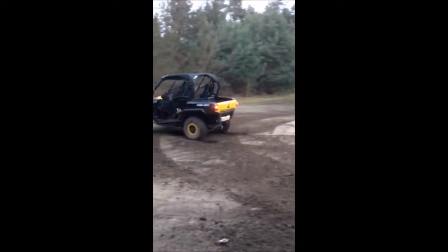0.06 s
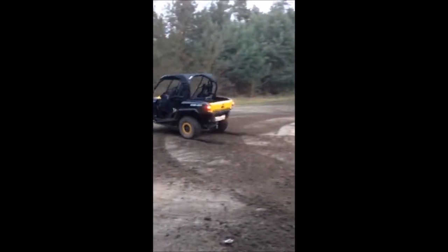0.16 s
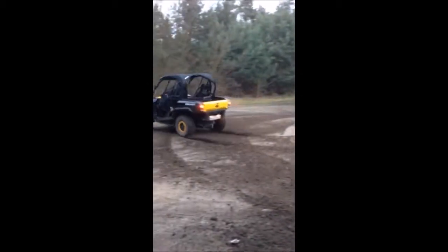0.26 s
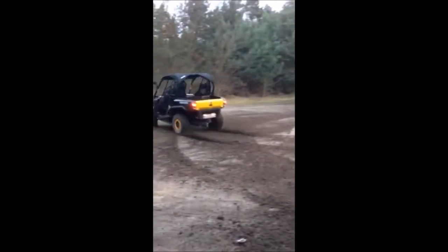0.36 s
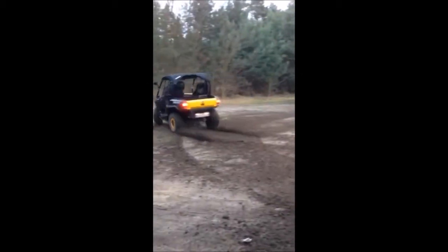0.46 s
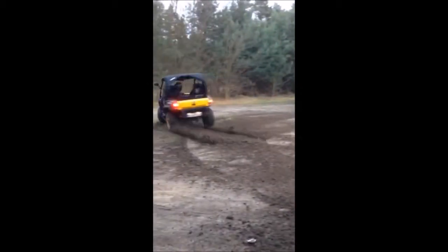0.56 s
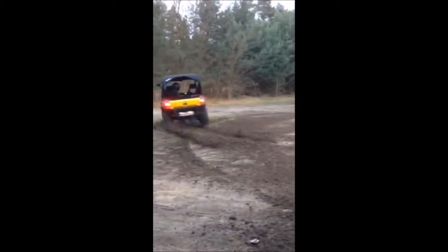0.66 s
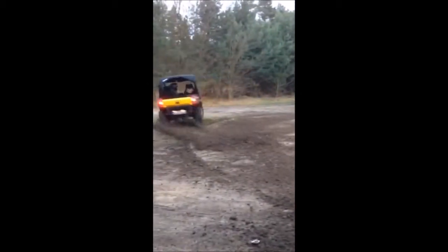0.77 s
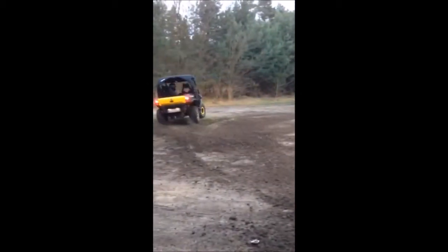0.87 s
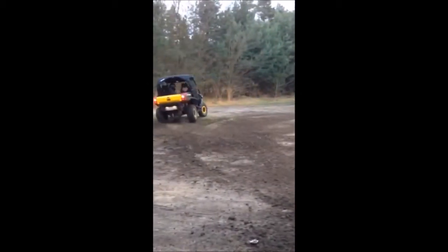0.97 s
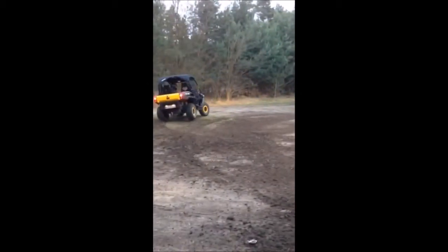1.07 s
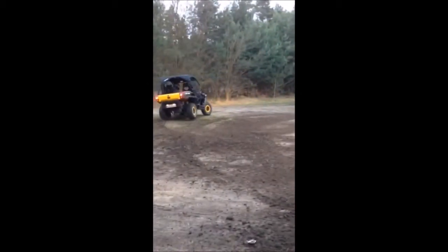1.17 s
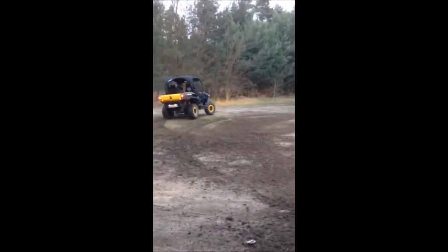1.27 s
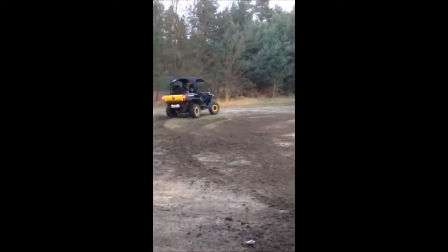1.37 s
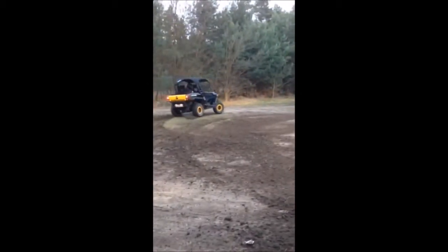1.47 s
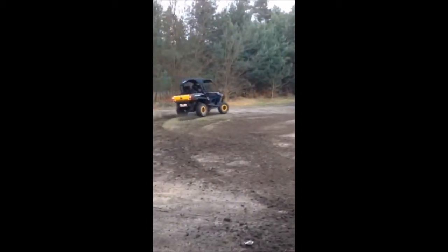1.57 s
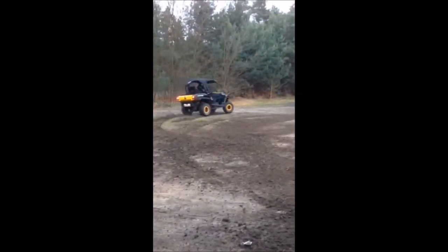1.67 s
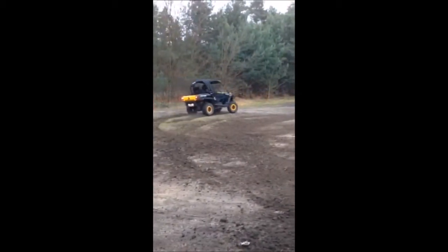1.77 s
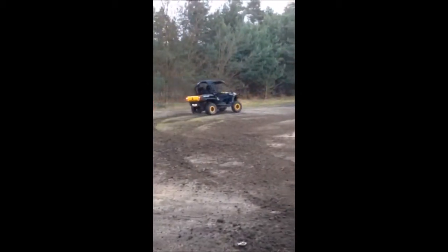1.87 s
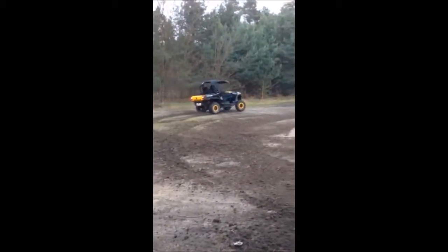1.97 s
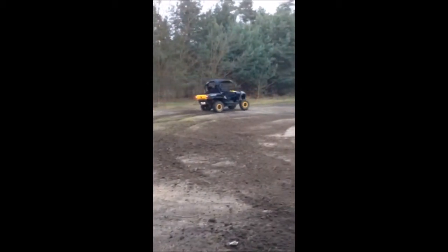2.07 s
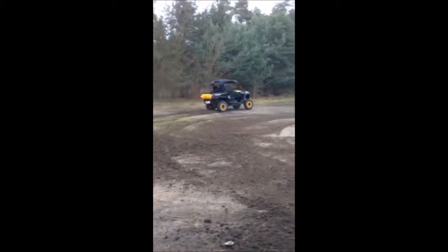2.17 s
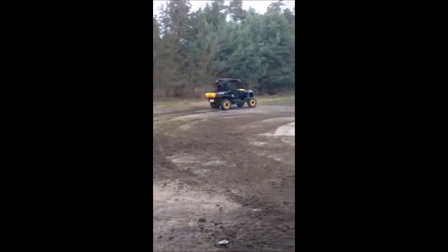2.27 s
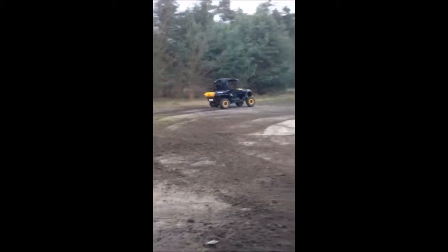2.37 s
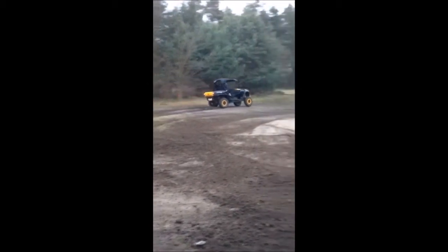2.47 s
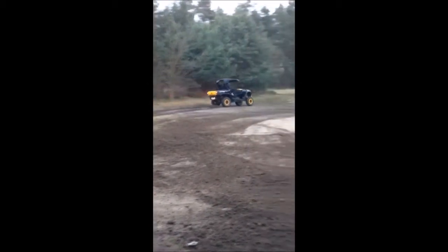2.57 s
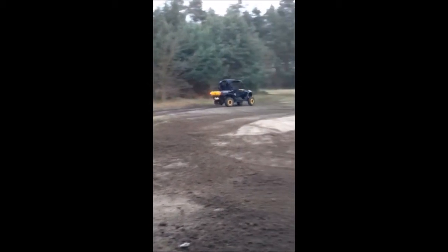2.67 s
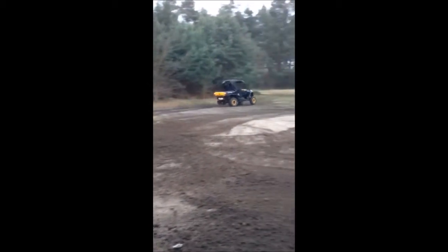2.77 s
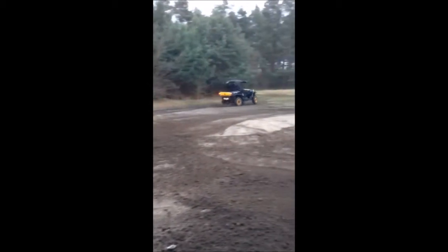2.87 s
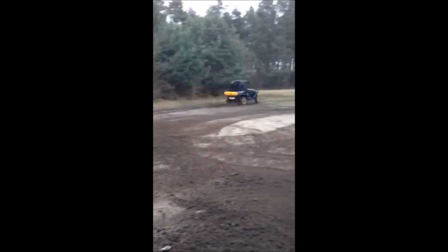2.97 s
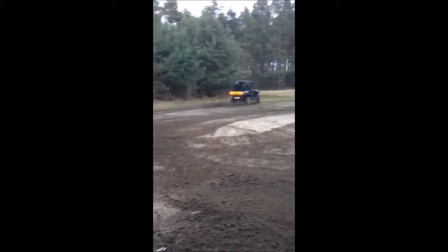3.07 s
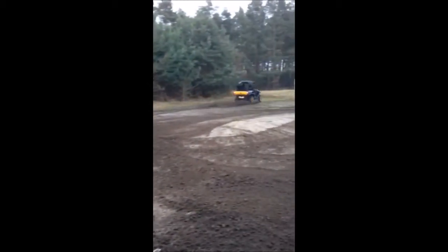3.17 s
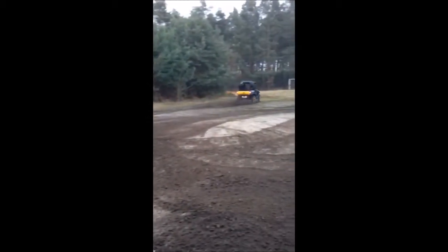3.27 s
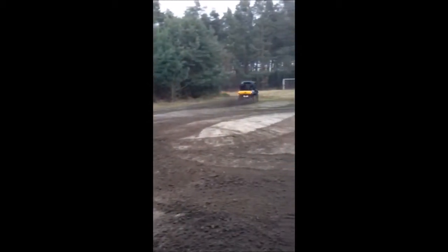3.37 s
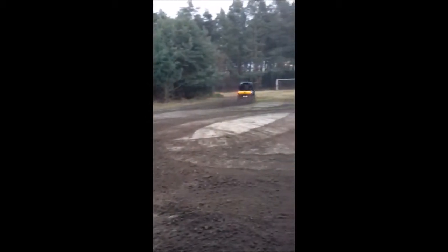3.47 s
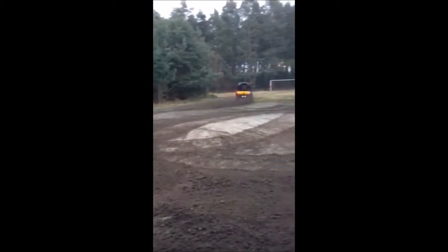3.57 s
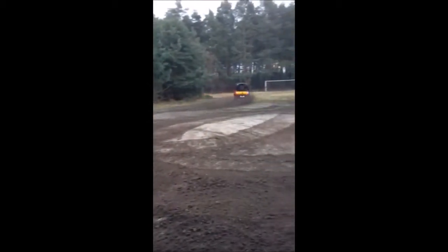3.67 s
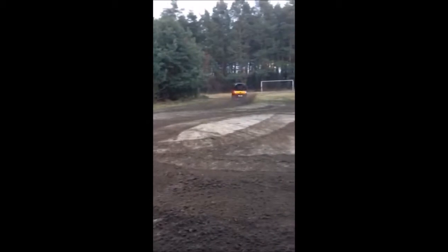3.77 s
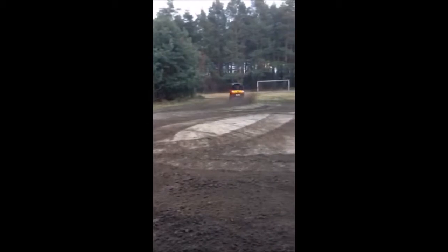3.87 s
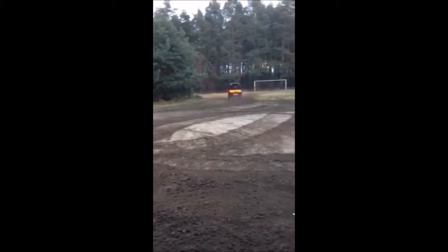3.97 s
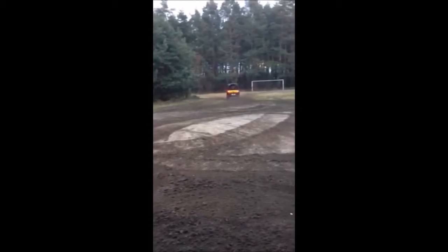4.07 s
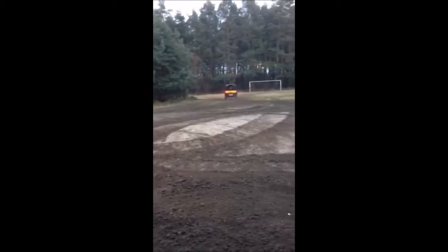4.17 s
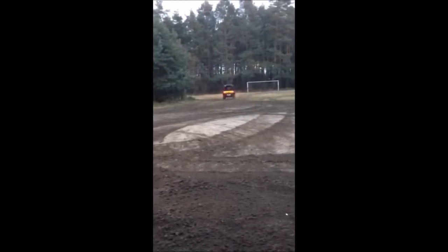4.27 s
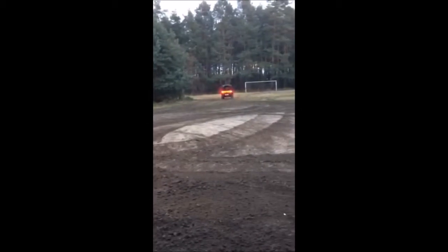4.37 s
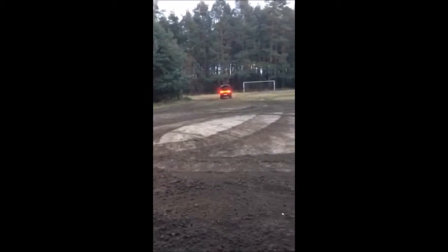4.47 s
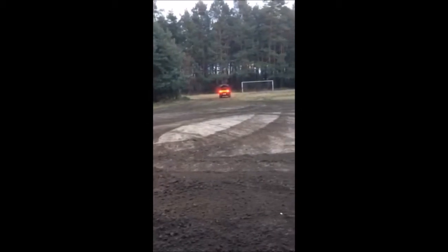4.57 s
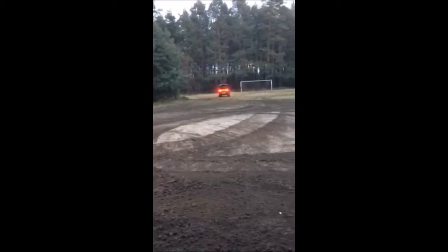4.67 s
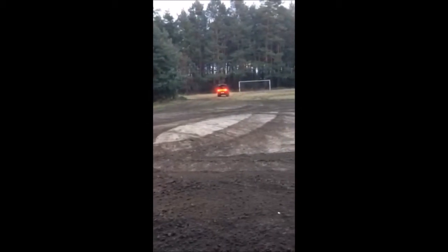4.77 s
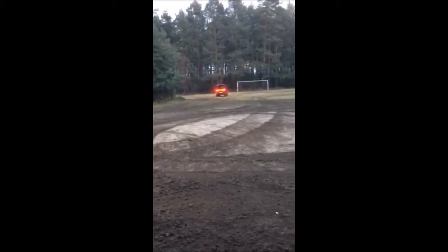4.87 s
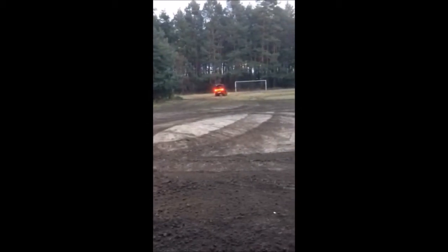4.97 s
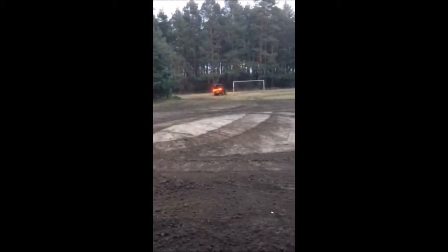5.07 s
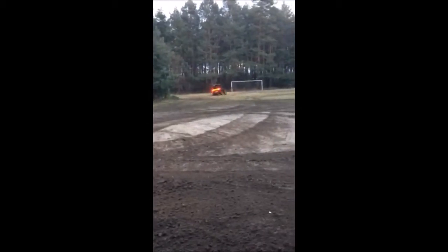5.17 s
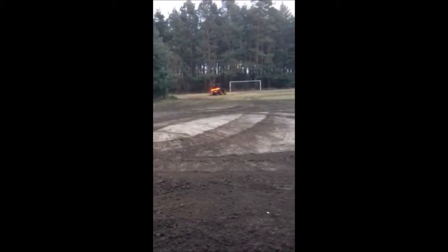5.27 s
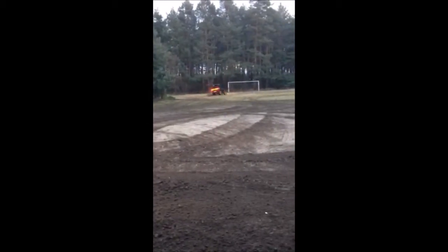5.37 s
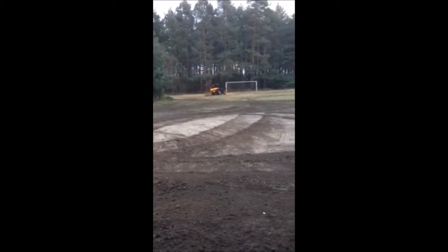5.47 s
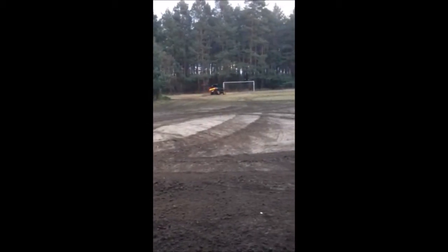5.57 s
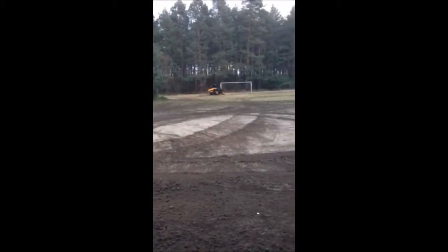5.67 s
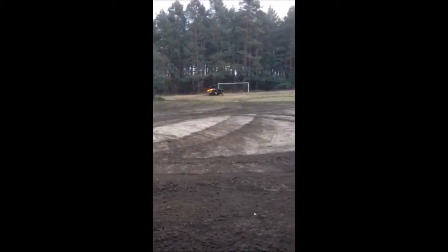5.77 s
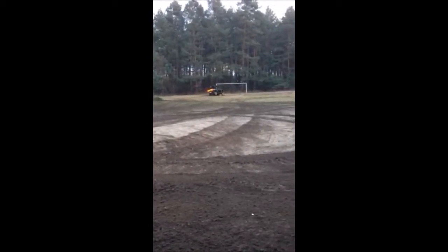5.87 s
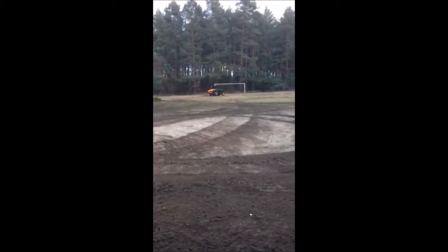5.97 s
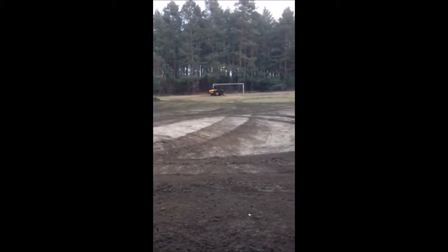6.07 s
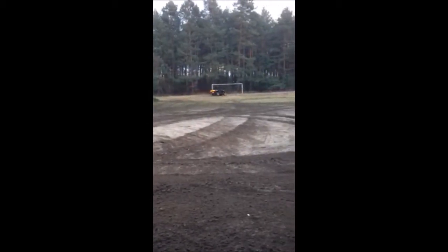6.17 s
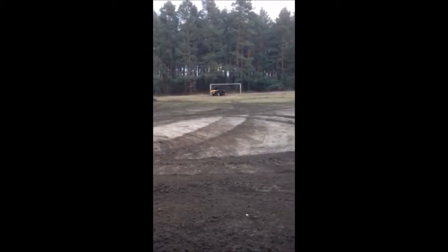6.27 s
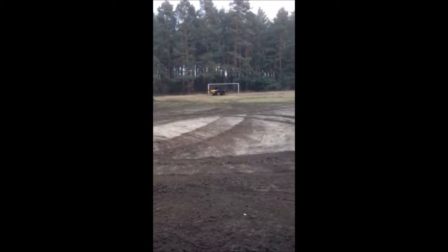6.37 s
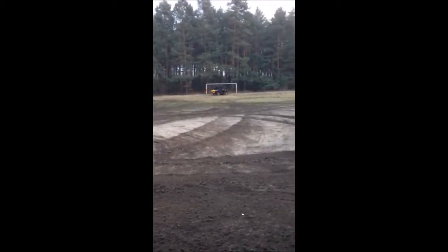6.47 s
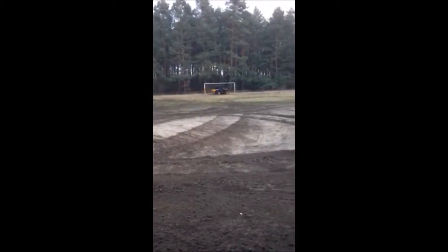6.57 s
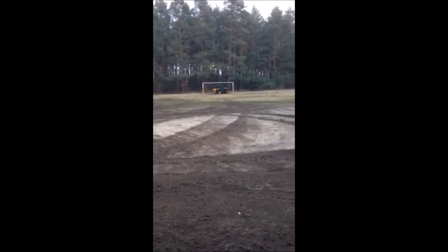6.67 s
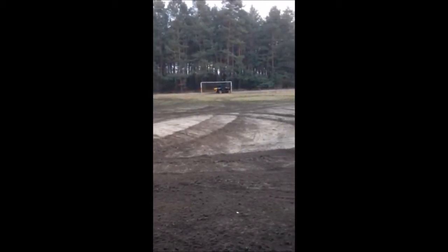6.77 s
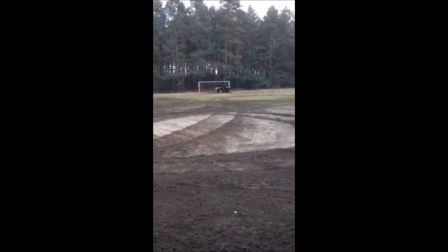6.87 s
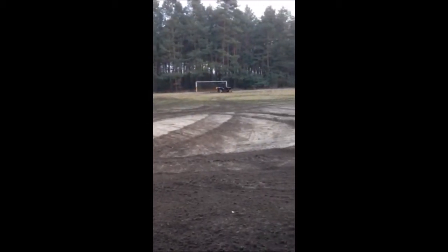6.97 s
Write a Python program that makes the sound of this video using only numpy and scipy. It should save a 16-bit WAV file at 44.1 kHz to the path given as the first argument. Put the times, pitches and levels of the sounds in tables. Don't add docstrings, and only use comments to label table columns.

```python
import sys
import numpy as np
from scipy import signal
from scipy.fft import rfft, irfft
from scipy.io import wavfile
from scipy.ndimage import uniform_filter1d, map_coordinates

SR = 44100
rng = np.random.default_rng(int(sys.argv[2]) if len(sys.argv) > 2 else 0)


def file_out(sig):
    cols = np.atleast_2d(sig).T
    lim = np.clip(cols, -1, 1)
    pcm = np.round(lim * 32767).astype(np.int16)
    wavfile.write(sys.argv[1], SR, pcm)


def volts_from_db(level):
    exponent = np.asarray(level, float) / 20
    return 10 ** exponent


N = 310023
T = np.arange(N) / SR

# f/Hz, level/dB per Hz
FIELD = [(15, -43), (25, -13), (69, -9), (99, -21), (160, 6), (246, -19), (581, -16), (894, -20.5),
         (2170, -18.5), (3160, -25.5), (4030, -25), (6200, -44), (15500, -51)]
FIELD_DB = -43.5

# t/s, opening 0-1
THROTTLE = [(0, 1), (.6, 1), (.75, 0), (1.255, 0), (1.265, 1), (3.85, 1), (4.1, 0), (6.53, 0), (6.54, 1),
            (6.88, 1), (6.91, .3), (7.03, .3)]
# t/s, heading number
HEADING = [(0, 0), (1.3, 0), (1.42, 1), (1.85, 1), (1.97, 2), (2.4, 2), (2.8, 3), (3.9, 3), (4.3, 4),
           (6.5, 4), (6.55, 0), (7.03, 0)]
# t/s, cycle rate/Hz
SPEED = [(0, 31.84), (.42, 49.64), (.6, 50.02), (1.0, 28.79), (1.2, 25.4), (1.45, 40.77), (1.82, 42.28),
         (2.18, 50.34), (2.75, 54.03), (3.4, 55.83), (3.84, 54.74), (3.98, 49), (4.28, 41.94), (4.5, 34.06),
         (6.46, 25.3), (6.62, 37.67), (6.86, 44.53), (7.03, 39.3)]
FLYWHEEL_S = .06
GAP = 0.2916

# t/s, f/Hz
BELT = [(4.55, 3540), (4.84, 3450), (5.06, 3090), (5.48, 2870), (5.62, 2690), (5.73, 3665), (6.12, 3170),
        (6.36, 2730), (6.48, 2830), (6.85, 3750), (7.0, 3700)]
# start/s, end/s, multiple of the tooth rate, level/dB
SQUEALS = [
    (4.62, 4.9, 1, -54),
    (4.88, 5.54, 1, -57),
    (4.63, 4.9, 1.205, -57),
    (4.88, 5.09, 1.2, -60),
    (5.07, 5.61, 1.195, -54),
    (5.0, 5.2, 1.78, -66),
    (5.2, 5.5, 1.8, -63),
    (5.74, 6.13, 1.2, -57),
    (6.25, 6.48, 1.2, -61.5),
    (6.85, 6.97, 1.2, -60),
]
# t/s, level/dB
SHELL = [(0, -25.5), (.08, -25.5), (.3, -28.5), (.55, -34.5), (.9, -80), (3.2, -70), (3.6, -61), (4.1, -57), (4.6, -75)]

# f/Hz, level/dB per Hz
JET = [(350, -42), (650, -14), (950, -6), (1210, -12), (1660, -11), (2140, -17.5), (2800, -18), (4080, -18),
       (5970, -24.5), (10000, -29), (13700, -36.5), (15400, -46)]
# t/s, level/dB at 4 kHz
SPRAY = [(0, -33.5), (.1, -32), (.5, -30), (.9, -45.5), (1.2, -54), (1.36, -38.5), (1.65, -36.5),
         (1.95, -36), (2.1, -31), (2.35, -33), (2.6, -31), (3.2, -30.5), (3.6, -35.5), (4.4, -51.5),
         (4.8, -48.5), (5.45, -47.5), (5.65, -54.5), (6.5, -54.5)]
RASP_DB = [3, -2, -1, -2.5, -2]
FIZZ_DB = [-7, -9.5, -6, -4, -4]
# t/s, length/s, rasp level/dB
SCUFFS = [
    (3.953, 0.17, 5),
    (4.299, .2, 6),
    (6.243, 0.2, 11),
]
FAR_REV_DB, FAR_RASP_DB, FAR_FIZZ_DB, DULL_DB_PER_S = 8, -12.5, 0, -9

# t/s, level/dB
REACH = [(0, -19.5), (.06, -14), (.58, -16.5), (.84, -22), (.92, -26), (1.22, -25.5), (1.42, -18),
         (1.75, -22.5), (2.4, -19), (2.55, -20.5), (3.82, -19.5), (3.97, -24), (4.28, -27.5), (4.42, -30),
         (5.55, -32.5), (6.5, -41), (6.56, -32.5), (6.85, -32.5)]
OPEN_DB = 5
# order, level/dB for each heading (the last also for a shut throttle)
LOW = [
    (2, -6.5, -2.5, -3, -3.5, -1.5),
    (3, -5.5, -7.5, -8, -6.5, -8.5),
    (4, -3, -3, -2.5, -1.5, -1),
]
UPPER_DB = [-9.5, -11.5, -11, -9, -11.5]
# order, level/dB for each heading
PIPE = [(5, -10, -8, -13, -5, -2), (6, -4, -3, -8, -7, 0), (7, -5, -6, -7, -7, -1),
        (8, -8, -11, -16, -10, -10), (9, -10, -15, -9, -20, -10), (10, -11, -5, -7, -16, -7),
        (11, -17, -15, -16, -12, -10), (12, -14, -15, -17, -19, -15), (13, -14, -18, -12, -20, -19),
        (14, -18, -17, -10, -20, -18), (15, -21, -20, -23, -23, -17), (16, -22, -21, -19, -20, -14),
        (17, -27, -23, -18, -16, -16), (18, -21, -25, -22, -21, -20), (19, -25, -24, -18, -22, -16),
        (20, -27, -24, -24, -23, -16)]
# f/Hz, level/dB
RING = [(50, -11.5), (90, -5), (105, -4.5), (113, -5.5), (125, 1), (160, 2.5), (200, 2), (230, -2)]
RINGING = [-.1, 0, .15, .3, 0]
# t/s, order (0 = all upper ones), length/s, level/dB
FADES = [(0.89, 3, 0.056, -7), (2.255, 4, 0.14, -14), (3.59, 2, 0.28, -14.5), (0.61, 4, 0.033, -4.5),
         (2.93, 3, 0.085, -5), (3.92, 4, 0.093, -7.5), (4.05, 2, 0.097, 6.5), (5.3, 2, 0.34, -2),
         (6.22, 3, 0.33, 10), (0.99, 3, 0.05, 13), (6.3, 4, 0.25, 1.5), (3.74, 2, 0.051, -15),
         (6.92, 2, 0.11, 4), (6.35, 2, .15, 0), (2.1, 0, 0.14, 3), (.5, 0, 0.07, 1.5), (3.405, 0, 0.093, 3),
         (0.81, 5, 0.22, 6), (1.15, 6, 0.14, 7.5), (0.034, 5, 0.043, 10), (0.071, 6, 0.055, 7),
         (2.26, 9, 0.071, -5), (2.037, 11, 0.1, 8.5), (2.04, 2, 0.083, -1.5), (0.091, 19, .1, -9),
         (2.93, 16, 0.043, 8), (3.07, 17, 0.081, 6), (6.8, 10, 0.11, 5), (.55, 6, .1, -6),
         (.45, 12, 0.096, 5.5)]
# f/Hz, level/dB per Hz
FLUTTER = [(40, -42), (90, -2), (200, 6), (400, 1.5), (650, -5), (950, -18), (1400, -35)]
SNAP_DB, SNAP_S = 4, 0.058

# t/s, all kept below f/Hz, three lone bands f/Hz
THINNED = [(.249, 950, 1590, 4770, 4770), (.569, 1500, 2400, 3200, 3200), (.824, 3000, 4400, 4400, 4400),
           (1.402, 700, 1500, 2930, 3900), (1.41, 700, 1500, 2930, 3900), (1.418, 700, 1500, 2930, 3450),
           (1.784, 1050, 5550, 5550, 5550), (2.915, 1050, 860, 860, 860), (3.021, 1450, 3830, 4770, 4770),
           (3.171, 1100, 1720, 3200, 4200), (3.34, 1050, 2000, 3500, 4100), (3.64, 900, 3350, 3870, 4640),
           (3.726, 1050, 2500, 2850, 2850), (3.811, 1500, 990, 990, 990), (4.045, 1800, 2400, 2900, 2900),
           (4.512, 4500, 860, 860, 860), (5.881, 2200, 4200, 4200, 4200), (5.988, 1600, 2700, 4050, 4050),
           (6.03, 2900, 4050, 4050, 4050), (6.2, 2300, 3000, 3000, 3000), (6.904, 1100, 2700, 4400, 4400),
           (6.948, 1900, 3000, 4500, 4500)]


def evened(x):
    return x / np.sqrt(np.mean(x ** 2) + 1e-20)


def bump(t, s, length):
    return np.exp(-.5 * ((t - s) / length) ** 2)


def read(points, hz):
    f, value = np.transpose(points)
    return np.interp(np.log(hz + 1), np.log(f + 1), value)


def columns(rows, t):
    s, *rest = np.transpose(rows)
    return [np.interp(t, s, c) for c in rest]


def drift(hz):
    knots = rng.standard_normal(400)
    return map_coordinates(knots, [np.clip(T * hz, 0, 398)], order=3)


def noise(shape_db, patchy_db):
    frames = N // 128 + 5
    hz = np.fft.rfftfreq(512, 1 / SR)[:, None]
    a, b, patches, bands = rng.standard_normal((frames, 257, 4)).T
    patches = uniform_filter1d(patches, size=8, axis=0)
    patches = evened(uniform_filter1d(patches, size=5, axis=1))
    bands = uniform_filter1d(bands, size=2, axis=0)
    bands = evened(uniform_filter1d(bands, size=150, axis=1))
    level_db = shape_db(hz, np.arange(frames) * 128 / SR) + patchy_db * (patches + bands)
    z = (a + 1j * b) * volts_from_db(level_db)
    return signal.istft(z, nperseg=512, noverlap=384)[1][:N]


def puffs(turns, lag, length, second):
    out = np.zeros(N)
    for side, strength in ((-.5, 0.33), (.5, second)):
        place = turns - side * GAP - lag + 1
        size = volts_from_db(2.5 * rng.standard_normal(600))[place.astype(int)]
        u = (place % 1) / length
        out += strength * size * u ** .2 * np.exp(-u)
    return evened(out)


def field():
    air = noise(lambda f, s: read(FIELD, f) + 0 * s, patchy_db=1.2)
    return volts_from_db(FIELD_DB) * evened(air)


def trees(x, t60):
    taps = np.zeros(SR // 2)
    at = np.arange(1500, SR // 2 - 40, 40)
    spread = rng.integers(0, 40, len(at))
    taps[at + spread] = rng.choice([-1., 1.], len(at)) * volts_from_db(-60 * at / SR / t60)
    return signal.oaconvolve(x, taps / np.linalg.norm(taps))[:N]


def whine(start, end, multiple, level_db):
    hz = multiple * columns(BELT, T)[0]
    fade = np.clip(np.minimum(T - start, end - T) / 0.01, 0, 1)
    angle = 2 * np.pi * np.cumsum(hz * (1 + 0.007 * drift(55))) / SR
    return np.sqrt(2) * fade * volts_from_db(level_db - 1 + 2.3 * drift(45)) * np.sin(angle)


def shell(turns):
    def rings_db(f, s):
        low_ring = np.exp(-((f - 1620) / 300) ** 2)
        high_ring = .5 * np.exp(-((f - 3100) / 450) ** 2)
        return 20 * np.log10(low_ring + high_ring + 0.022) + 0 * s
    metal = evened(noise(rings_db, patchy_db=3))
    cracks = puffs(turns, lag=.03, length=.09, second=.65) ** 1.5
    return volts_from_db(columns(SHELL, T)[0]) * evened(metal * cracks)


def hiss(turns):
    def shape_db(f, s):
        (level_db,), (heading,), (gas,) = columns(SPRAY, s), columns(HEADING, s), columns(THROTTLE, s)
        rev_s = SPRAY[-1][0]
        far = gas * np.clip(0.3 + (s - rev_s) / 0.33, 0, 1) * (s > rev_s)
        rasp_db = np.interp(heading, range(5), RASP_DB) + FAR_RASP_DB * far
        rasp_db = rasp_db + sum(db * bump(s, at, length) for at, length, db in SCUFFS)
        fizz_db = np.interp(heading, range(5), FIZZ_DB) + FAR_FIZZ_DB * far
        fizz_db = fizz_db + DULL_DB_PER_S * np.clip(s - 2.9, 0, 1.1) * (1 - far)
        low = np.clip(np.log2(2600 / (f + 1)) / .6, 0, 1)
        high = np.clip(np.log2((f + 1) / 5000), 0, 1.3)
        return read(JET, f) + level_db + FAR_REV_DB * far + low * (rasp_db - 4) + high * (fizz_db + 5.5)

    (load,), (heading,) = columns(THROTTLE, T), columns(HEADING, T)
    lag = .05 + .22 * np.minimum(heading, 1)
    gate = .75 + (.06 + .3 * load) * puffs(turns, lag=lag, length=.11, second=.3)
    sizes = volts_from_db(3.0 * np.minimum(rng.exponential(1, N), 3))
    grit = sizes * (rng.random(N) < 150 / SR)
    grit = signal.oaconvolve(grit, np.exp(-np.arange(200) / 35))[:N]
    return volts_from_db(4) * noise(shape_db, patchy_db=1.47) * (gate + 0.067 * load * grit)


def exhaust():
    hz = uniform_filter1d(columns(SPEED, T)[0], size=round(FLYWHEEL_S * SR), mode="nearest")
    (load,), (heading,), (reach_db,) = columns(THROTTLE, T), columns(HEADING, T), columns(REACH, T)
    shut = 1 - load

    def at_heading(row):
        return np.interp(heading, range(5), row)

    def by_heading(row):
        return load * at_heading(row) + shut * row[-1]

    def echo_db(k):
        return sum(db * bump(T, s, length) for s, order, length, db in FADES if round(order) == round(k))

    level_db = reach_db + OPEN_DB * load
    opened = np.maximum(np.diff(load, prepend=0), 0)
    snap = signal.lfilter([1], [1, -np.exp(-1 / (SNAP_S * SR))], opened)
    upper_db = level_db + by_heading(UPPER_DB) + SNAP_DB * snap + echo_db(0)

    turns = np.cumsum(hz * (1 + (.004 + .006 * shut) * drift(25))) / SR - .4
    angle = 2 * np.pi * turns
    uneven_db = 1.2 + 0.3 * shut

    first_db = level_db - 1.5 + read([(25, -40), (40, -30.5), (56, -20.5)], hz)
    two_db, three_db, four_db = (level_db + by_heading(row) + read(RING, k * hz) + echo_db(k)
                                 for k, *row in LOW)
    out = volts_from_db(first_db) * np.sin(angle)
    out += volts_from_db(two_db + uneven_db * drift(24.73)) * np.cos(2 * angle + 0.28 - 2.85 * load)
    out += volts_from_db(three_db + uneven_db * drift(27)) * np.cos(3 * angle + at_heading(RINGING))
    out += volts_from_db(four_db + uneven_db * drift(27)) * np.cos(4 * angle)

    for k, *levels_db in PIPE:
        sign = -np.sign(np.cos(np.pi * round(k) * GAP))
        order_db = upper_db + at_heading(levels_db) + echo_db(k) - .12 * k + 2.5 * drift(6)
        slip = .35 * drift(3) + (.018 + .02 * shut) * k * drift(30)
        out += sign * volts_from_db(order_db) * np.cos(round(k) * angle + slip)

    rough = evened(noise(lambda f, s: read(FLUTTER, f) + 0 * s, patchy_db=1.2))
    rough *= 0.92 + 0.6 * puffs(turns, lag=0.013, length=0.36, second=1.0)
    return np.sqrt(2) * out + volts_from_db(upper_db - 8 + 3 * shut) * rough, turns


def thin_out(x):
    out = x.copy()
    hz = np.fft.rfftfreq(1600, 1 / SR)
    window = signal.windows.cosine(1600)
    for s, below_hz, *bands_hz in THINNED:
        at = slice(round(s * SR) - 800, round(s * SR) + 800)
        body = .07 + .93 * (hz < below_hz)
        lone = [1.6 * (abs(hz - f) < 90) for f in bands_hz]
        kept = np.max([body] + lone, axis=0)
        out[at] -= window * irfft(rfft(window * out[at]) * (1 - kept))
    return out


def scene():
    tone, turns = exhaust()
    vehicle = tone + hiss(turns) + shell(turns) + sum(whine(*row) for row in SQUEALS)
    echo = volts_from_db(-19) * trees(vehicle, t60=.5)
    return (vehicle + echo + field())[None]


def low_pass(x):
    return signal.sosfilt(signal.butter(12, 15610, fs=SR, output="sos"), x)


def record(dry):
    clipped = np.clip(dry[0], -1, 1)
    lowpass = signal.firwin(511, 15350, window=("kaiser", 9), fs=SR)
    limited = signal.oaconvolve(clipped, lowpass, "same")
    mix = thin_out(limited)[None]
    return low_pass(mix)


dry = scene()
out = record(dry)
file_out(out)
```